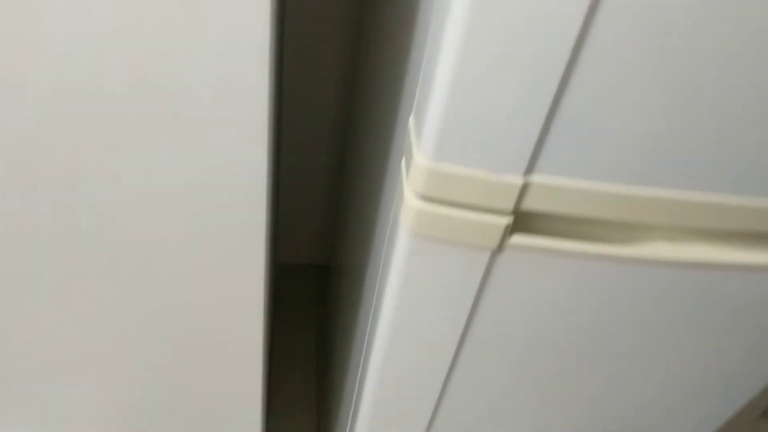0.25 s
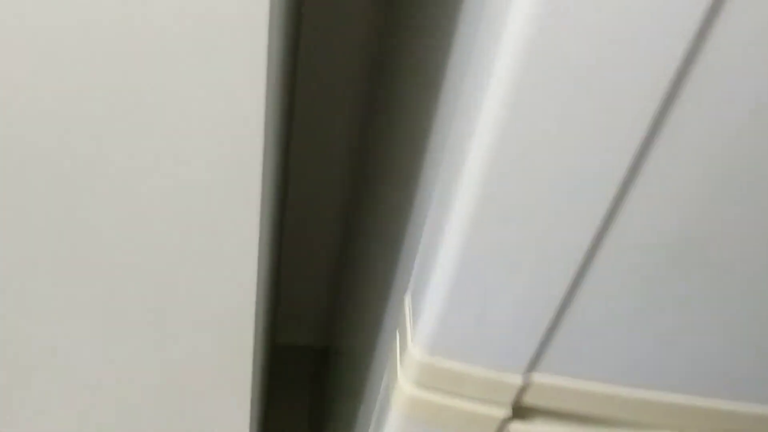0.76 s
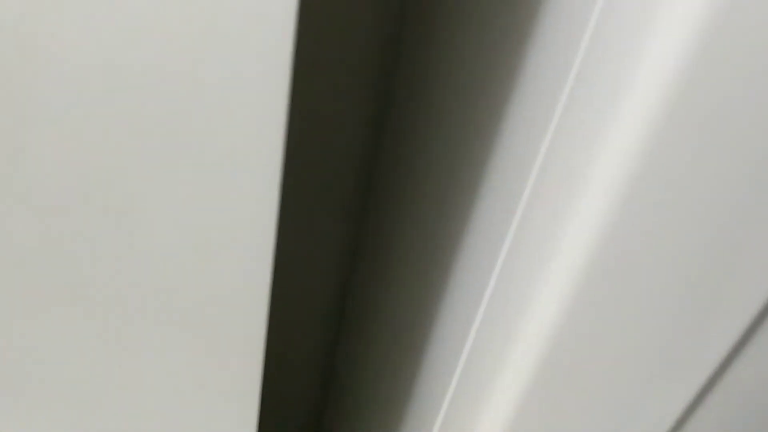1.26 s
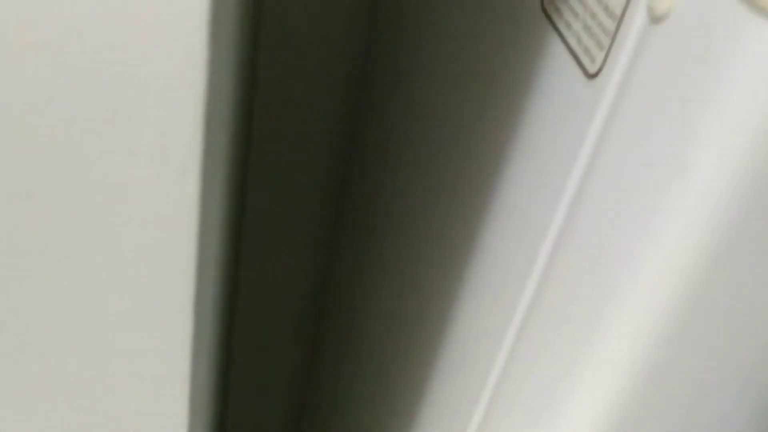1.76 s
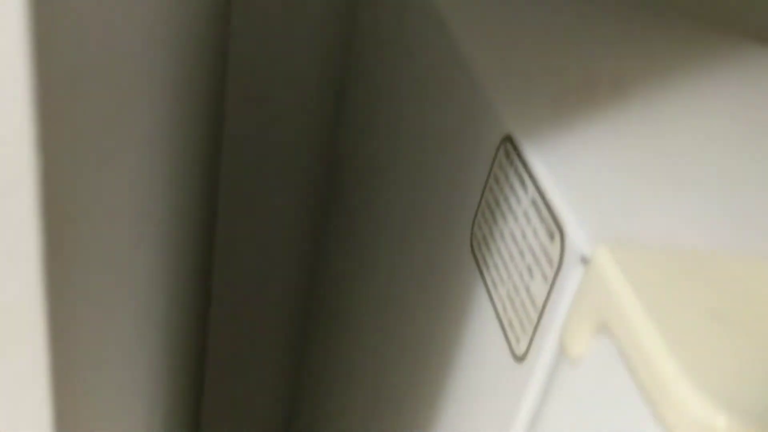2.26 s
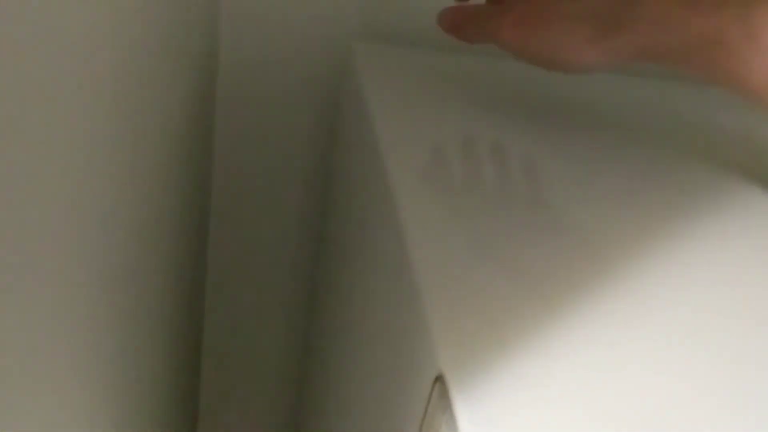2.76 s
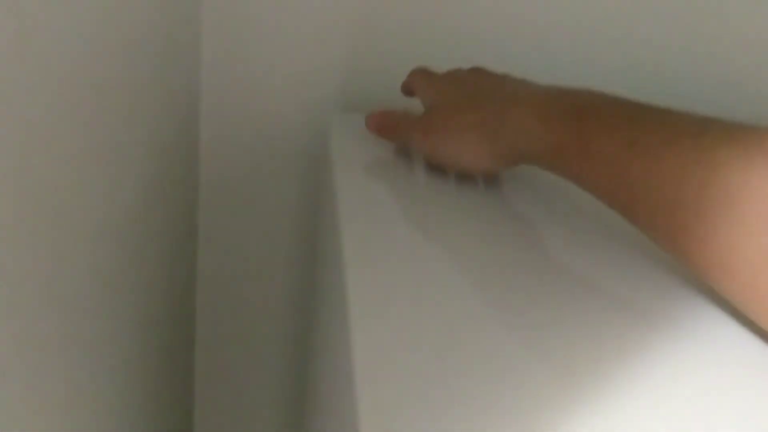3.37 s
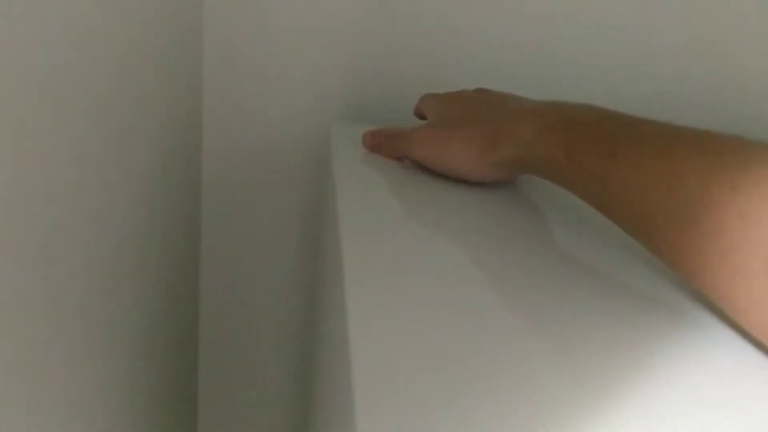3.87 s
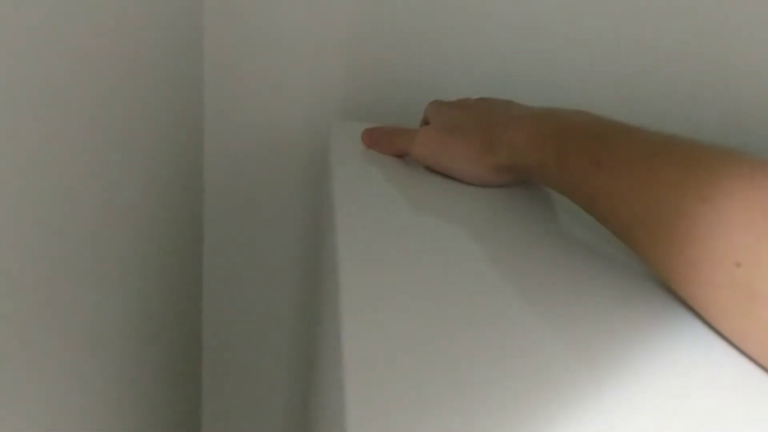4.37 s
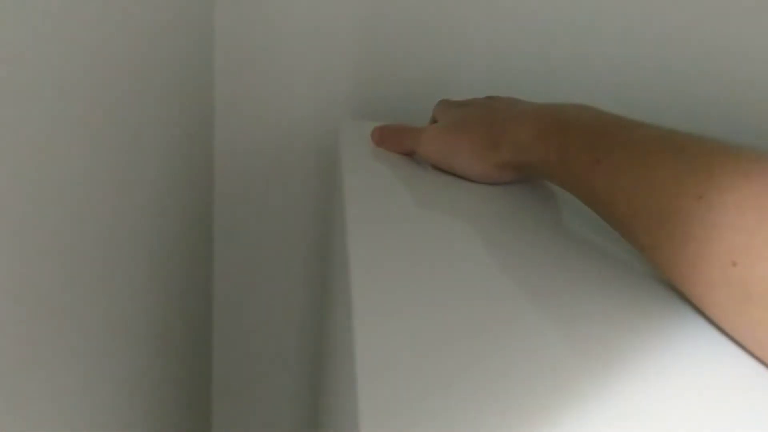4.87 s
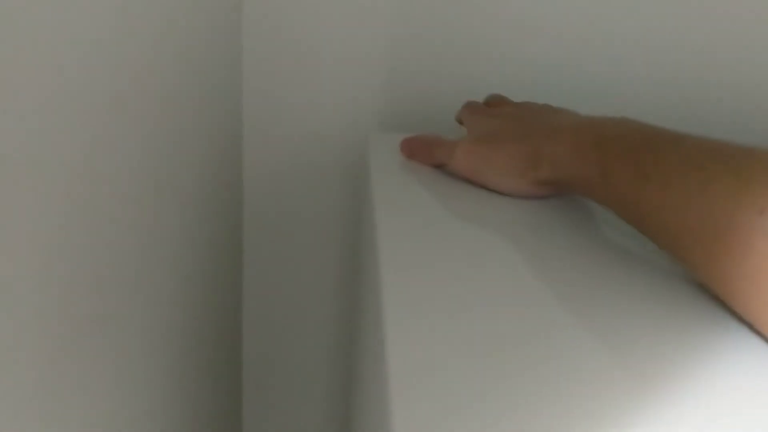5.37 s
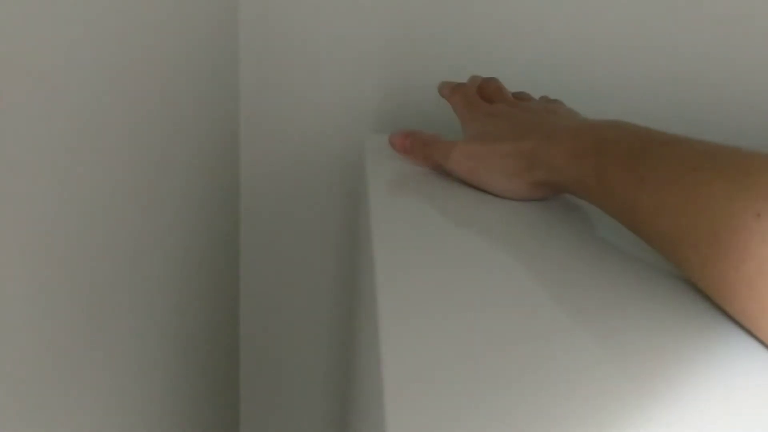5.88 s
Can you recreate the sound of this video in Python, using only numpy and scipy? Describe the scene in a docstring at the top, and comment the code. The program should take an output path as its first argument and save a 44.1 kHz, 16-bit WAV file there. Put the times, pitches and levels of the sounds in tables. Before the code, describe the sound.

A refrigerator compressor hums with a fine, high buzz in a small, quiet room. A light, sharp click sounds early on. As the microphone rises from the doors to the top, the hum grows louder and its tones waver. Then, when a hand presses on the top, a loose metal part starts to rattle, throbbing in two swells with small hollow knocks over soft room noise.

```python
"""In a small quiet room a refrigerator hums while the microphone rises from its doors to its top.
The piston compressor shakes the cabinet once a turn, giving a harmonic hum and a fine buzz whose
partials swell and fade through standing waves. When a hand presses on the top, a loose metal part
starts to bounce, and its impacts ring the metal in two throbbing swells of rattle.
A few light clicks and faint brushes of fingers sound nearby, over the soft noise of the room."""
import sys
import numpy as np
from scipy import signal
from scipy.fft import rfft, irfft, next_fast_len
from scipy.io import wavfile
from scipy.ndimage import uniform_filter1d

SR = 44100
rng = np.random.default_rng(int(sys.argv[2]) if len(sys.argv) > 2 else 0)


def generate_wav(signal):
    """Clip the signal to [-1, 1] and save it as 16-bit WAV at the path in sys.argv[1]."""
    frames = np.transpose(np.atleast_2d(signal))
    scaled = np.clip(frames, -1, 1) * 32767
    pcm = np.round(scaled).astype(np.int16)
    wavfile.write(sys.argv[1], SR, pcm)


N = 269451
TIME = np.arange(N) / SR
SLOW_TIME = TIME[::100]   # coarse grid for slowly changing gains and phases
TURN_HZ = 48.86   # compressor shaft; its harmonics are called orders
SWAY_HZ, SWAY_DB, SWAY_RADIANS = 8.4, 2.8, .33   # rocking rate; its swing of level and phase


def from_db(db):
    """Amplitude grows tenfold with every 20 dB."""
    return 10 ** (np.asarray(db) / 20)


def rms_one(x):
    """Normalisation to unit mean power."""
    return x / np.sqrt(np.mean(x ** 2) + 1e-20)


def evened(x, size):
    """Division by the running rms over size samples flattens the envelope."""
    return x / np.sqrt(np.abs(uniform_filter1d(x ** 2, size=size)) + 1e-12)


def drift(rate, at=TIME):
    """Band-limited random variation: lines joining Gaussian values, rate of them per unit of at."""
    knots = rng.standard_normal(4096)
    return np.interp(at * rate, np.arange(len(knots)), knots)


def filtered(x, order, cutoff_hz, side):
    """Butterworth filtering passes the "low" or the "high" side of the cutoff."""
    return signal.sosfilt(signal.butter(order, cutoff_hz, side, fs=SR, output="sos"), x)


def coloured(x, spectrum):
    """Spectral shaping by a smooth curve through rows of frequency_hz, gain_db."""
    hz, db = np.transpose(spectrum)
    size = next_fast_len(len(x))
    bins = np.maximum(np.fft.rfftfreq(size, 1 / SR), 1)
    gain = from_db(np.interp(np.log(bins), np.log(hz), db))
    return irfft(rfft(x, size) * gain, size)[:len(x)]


def resonate(x, modes):
    """Modal superposition: damped resonators in parallel, with alternating signs."""
    out = 0
    for k, (hz, width_hz, db) in enumerate(modes):
        radius = np.exp(-np.pi * width_hz / SR)
        poles = [1, -2 * radius * np.cos(2 * np.pi * hz / SR), radius ** 2]
        ring = signal.lfilter([1, 0, -1], poles, x + 1e-18)
        out = out + (-1) ** k * from_db(db) * (1 - radius ** 2) / 2 * ring
    return out


def reverberate(x, t60_s, wet_db):
    """Diffuse reflections add a tail of exponentially decaying noise."""
    age = TIME[:SR // 2]
    tail = rng.standard_normal(len(age)) * np.exp(-np.log(1000) * age / t60_s)
    return x + from_db(wet_db) * signal.fftconvolve(x, tail / np.linalg.norm(tail))[:N]


# The microphone's rise: time_s, way_share
RISE = [(0, 0), (3.0, .88), (3.7, .98), (6.11, 1)]
def path(at=TIME):
    """Position in the sound field, as a share of the way from the doors (0) to the top (1)."""
    return np.interp(at, *np.transpose(RISE))


def along_path(doors_db, top_db):
    """A level gradient: the gain changes evenly in dB from the doors to the top."""
    return from_db(doors_db + (top_db - doors_db) * path())


def above(at=TIME, edge_share=0.68, width_share=0.12):
    """Acoustic shadow: 0 while the cabinet hides the gap behind it, nearing 1 past its upper edge."""
    return 1 / (1 + np.exp((edge_share - path(at)) / width_share))


# Spectrum of the room air: frequency_hz, gain_db
AIR_SPECTRUM = [(20, -30), (45, -2), (75, -3), (190, -1), (280, -1.5), (420, -6.5), (700, -9), (1050, -2),
                (1500, -6.5), (2500, -12.5), (4500, -19.5), (8000, -26), (15500, -41)]
def room_air(doors_db=-58, top_db=-52.5):
    """Ambient broadband noise, strongest in the bass and louder towards the top."""
    return along_path(doors_db, top_db) * rms_one(coloured(rng.standard_normal(N), AIR_SPECTRUM))


# Touches of the fingers: peak_s, level_db, half_length_s
FINGER_BRUSHES = [(.409, -69, 0.011), (.455, -72, .012), (.779, -68, .014), (1.523, -64, .015),
                  (4.099, -68, .012)]
# Spectrum of sliding skin: frequency_hz, gain_db
BRUSH_SPECTRUM = [(2000, -30), (5000, -5), (8500, -3), (11000, 1), (14000, 0), (16000, -7)]
def brushes():
    """Friction noise: skin slides briefly over the casing with a thin, soft hiss."""
    pressure = sum(from_db(db) * np.exp(-((TIME - s) / half_s) ** 2 / 2)
                   for s, db, half_s in FINGER_BRUSHES)
    return pressure * rms_one(coloured(rng.standard_normal(N), BRUSH_SPECTRUM))


# Light contacts: start_s, level_db, decay_s
CLICK_EVENTS = [(.407, -56.5, .006), (0.9737, -38, 0.0043), (0.9764, -38.5, 0.0035), (2.352, -57, .003)]
# Spectrum of the snap: frequency_hz, gain_db
CLICK_SPECTRUM = [(800, -10), (2300, -2), (3200, -6), (4700, -2), (6500, -9), (9000, -19), (12500, -19),
                  (16000, -24)]
# Resonances the clicks excite: pitch_hz, width_hz, gain_db
CLICK_RESONANCES = [(3950, 70, -6), (4230, 60, -1), (4880, 77, 1), (5500, 70, -4), (7470, 150, -12),
                    (12500, 120, -12)]
def clicks(tail_db=-15.0, tail_t60_s=0.49, ring_db=-13.0, ring_t60_s=0.19):
    """Impulsive excitation: each gritty snap leaves a thin ring and the diffuse tail of the room."""
    def dying(t60_s):
        """Exponential decay after each click, by 60 dB in t60_s."""
        return sum(from_db(db) * (TIME >= s) * np.exp(-np.log(1000) * np.abs(TIME - s) / t60_s)
                   for s, db, _ in CLICK_EVENTS)
    force = sum(from_db(db) * (TIME >= s) * np.exp(-np.abs(TIME - s) / decay_s)
                for s, db, decay_s in CLICK_EVENTS)
    grit = evened(coloured(rng.standard_normal(N), CLICK_SPECTRUM), size=60)
    ring = evened(resonate(rng.standard_normal(N), CLICK_RESONANCES), size=500)
    tail = from_db(tail_db) * dying(tail_t60_s)
    return np.hypot(force, tail) * grit + from_db(ring_db) * dying(ring_t60_s) * ring


# Mains hum and other motor tones: pitch_hz, level_at_top_db
STEADY_TONES = [(81, -66), (100, -59), (162, -65.5), (199.5, -65.5), (324, -68)]
def motor(doors_db=-13.0):
    """Steady forced vibration gives low pure tones, louder over the gap behind the cabinet."""
    tones = sum(from_db(db) * np.sin(2 * np.pi * (hz * TIME + rng.random())) for hz, db in STEADY_TONES)
    return np.sqrt(2) * tones * along_path(doors_db, 0)


def stroke(turns, depth=.38):
    """Amplitude modulation by the piston's push, once in every turn."""
    return 1 + depth * np.cos(2 * np.pi * turns)


def sway(at=TIME, doors_depth=.5):
    """Mass on springs: the compressor rocks, heard more from above; each call has its own phase."""
    depth = doors_depth + (1 - doors_depth) * above(at)
    return depth * np.sin(2 * np.pi * (SWAY_HZ * at + rng.random()))


def looseness(loose_at_s=4.385, loosen_s=0.024, seated_play=0.048):
    """Loss of contact: under the hand the part goes from slight play to free bouncing (1)."""
    return np.interp(TIME, [loose_at_s, loose_at_s + loosen_s], [seated_play, 1])


def ripple(place, antinode, spacing, reflection):
    """Interference: a tone and its reflection reinforce and weaken each other along the way."""
    return np.abs(1 + reflection * np.exp(2j * np.pi * (place - antinode) / spacing))


def standing_wave(place, doors_db, top_db, *pattern):
    """A standing wave from the wall lays nodes and antinodes over a tone's level gradient."""
    return from_db(doors_db + (top_db - doors_db) * place) * ripple(place, *pattern)


# High orders that meet a resonance of the pipes:
# order, doors_db, top_db, antinode_share, spacing_share, reflection_ratio
PIPE_ORDERS = [(54.0, -73.5, -69.0, 0.11, 0.35, 0.6), (63.0, -76.0, -67.5, 0.01, 0.31, 0.6),
               (75.0, -80.5, -72.5, 0.02, 0.26, 0.45), (76.0, -79.5, -74.5, 0.16, 0.25, 0.45),
               (78.0, -83.0, -73.5, 0.3, 0.75, 0.9), (80.0, -86.0, -76.0, 0.25, 0.71, 0.6),
               (89.0, -92.0, -69.5, 0.06, 1.51, 0.9), (96.0, -86.5, -78.5, 0.38, 0.8, 0.75),
               (101.0, -92.5, -80.0, 0.1, 0.22, 0.45), (112.0, -83.5, -83.5, 0.38, 0.53, 0.6),
               (114.0, -95.5, -79.5, 0.11, 0.22, 0.45)]
def pipes(turns, gain_db=-3.0, loose_loss_db=-4.0):
    """Resonance: thin metallic tones pulse with the stroke and swell and fade in standing waves."""
    place = path(SLOW_TIME)
    tones = 0
    for order, *wave in PIPE_ORDERS:
        gain = standing_wave(place, *wave) * from_db(SWAY_DB * sway(SLOW_TIME))
        phase = 2 * np.pi * (order * turns + rng.random())
        tones = tones + np.interp(TIME, SLOW_TIME, gain) * np.sin(phase)
    return np.sqrt(2) * tones * stroke(turns) * from_db(gain_db + loose_loss_db * looseness())


# Reflections of the buzz from the walls: doors_lag_s, top_lag_s, gain_ratio
WALL_REFLECTIONS = [(.00155, 0.000867, 0.2), (.0031, .00225, 0.33)]
def wall_echoes(x):
    """Comb filtering: echoes arrive sooner as the microphone rises, so the notches sweep upward."""
    return x + sum(gain * np.interp(TIME - doors_s - (top_s - doors_s) * path(), TIME, x)
                   for doors_s, top_s, gain in WALL_REFLECTIONS)


# Broad spectrum of the buzz: frequency_hz, gain_db
BUZZ_SPECTRUM = [(2300, -32), (3000, 0), (3400, -14.5), (4000, -16.5), (5400, -13), (6500, -16.5),
                 (8200, -28), (9300, -20), (12000, -17), (13800, -21), (15500, -17.5)]
# Resonances of shell and pipes: pitch_hz, width_hz, gain_db
SHELL_MODES = [(2596, 170, 0), (2960, 37, 3), (3067, 84, -4.5), (3300, 160, -14), (3680, 78, -3.5),
               (3870, 57, 1), (4230, 105, -8.5), (4740, 30, -6), (5460, 62, -22), (6790, 54, -8),
               (6960, 33, -16.5), (7920, 200, -11), (8580, 110, -17)]
def buzz(turns, doors_db=-64.5, top_db=-56, hiss_db=-24.0, fades_per_way=7.06, flutter=0.32,
         loose_loss_db=-3.0):
    """Periodic forcing rings the shell with high overtones; their mix varies with sway and position."""
    period = round(SR / TURN_HZ)
    angle = (turns + .0004 * drift(200)) % 1   # timing jitter blurs the highest overtones into hiss
    overtones = 0
    for _ in range(4):
        cycle = irfft(np.exp(2j * np.pi * rng.random(period // 2)), 4 * period)
        weight = drift(fades_per_way, path()) + flutter * sway()
        overtones = overtones + weight * np.interp(angle, np.arange(len(cycle)) / len(cycle), cycle)
    force = stroke(turns) * (evened(overtones, size=period) + from_db(hiss_db) * rng.standard_normal(N))
    shell = resonate(force, SHELL_MODES) + coloured(force, BUZZ_SPECTRUM)
    bright = filtered(shell, order=6, cutoff_hz=2400, side="high")
    gain = along_path(doors_db, top_db) * from_db(loose_loss_db * looseness())
    return gain * evened(wall_echoes(bright), size=9000)


# Base level of the shadowed orders: time_s, level_db
HUM_LEVEL = [(0, -55), (1.5, -50.5), (3.0, -50.5), (4.2, -50), (4.6, -54), (6.11, -51)]
# Orders whose balance shifts at the cabinet's edge, relative to that level: order, doors_db, above_db
SHADOWED_ORDERS = [(1, -12, -9), (2, -20, -23), (3, -22.5, -26), (4, -29.5, -19), (5, -17, -12.5),
                   (6, -14.5, -5.5), (7, -20, -51), (8, -22.5, -42), (35, -26, -21), (36, -18, -16.5),
                   (37, -25, -18), (38, -13.5, -35), (42, -14.5, -41), (43, -33, -18), (44, -17.5, -14.5),
                   (46, -27, -13), (47, -16.5, -28), (50, -12.5, -22)]
# Orders in standing waves: order, doors_db, top_db, antinode_share, spacing_share, reflection_ratio
STANDING_ORDERS = [(10.0, -69.5, -59.5, 0.42, 1.02, 0.45), (11.0, -58.0, -50.0, 0.3, 0.51, 0.25),
                   (12.0, -60, -51, 0.54, 0.85, 0.26), (13.0, -59.0, -58, 0.98, 1.17, 0.45),
                   (14.0, -59.5, -68, 0.43, 0.58, 0.39), (15.0, -62.5, -51.5, 0.54, 0.95, 0.54),
                   (16.0, -69.5, -51, 0.16, 0.528, 0.32), (17.0, -78, -51, 0.06, 0.38, 0.2),
                   (18.0, -63.5, -56.0, 0.14, 0.67, 0.65), (19.0, -58.5, -39, 0.26, 1.28, 0.71),
                   (20.0, -55.5, -50, 0.46, 0.78, 0.96), (21.0, -74.5, -46.5, 0.3, 1.35, 0.94),
                   (22.0, -48, -62.5, 0.24, 0.41, 0.42), (23.0, -55, -72, 0.68, 1.4, 0.81),
                   (24.0, -61, -60, 0.74, 0.75, 0.17), (25.0, -51.5, -49, 0.59, 0.89, 0.77),
                   (26.0, -55.5, -49, 0.45, 0.7, 0.32), (27.0, -57, -45.5, 0.18, 0.317, 0.31),
                   (28.0, -54.5, -60.5, 0.5, 0.71, 0.51), (29.0, -71, -47.5, 0.15, 0.55, 0.44),
                   (30.0, -74, -52.5, 0.53, 0.35, 0.3), (31.0, -59.5, -46, 0.13, 0.373, 0.42),
                   (32.0, -76, -61, 0.18, 0.64, 0.2), (33.0, -69.5, -53, 0.26, 0.63, 0.41),
                   (34.0, -77, -54.5, 0.06, 0.57, 0.48), (39.0, -51.5, -58.5, 0.4, 0.75, 0.48),
                   (40.0, -65.5, -63, 0.34, 0.38, 0.65), (41.0, -66.5, -61.5, 0.43, 0.84, 0.63),
                   (45.0, -73, -63, 0.02, 0.32, 0.16), (48.0, -76.0, -54, 0.053, 0.376, 0.38),
                   (49.0, -72, -58.5, 0.23, 0.51, 0.33)]
# Weaker reflections from the cabinet: order, antinode_share, spacing_share, reflection_ratio
CABINET_REFLECTIONS = [(19, .13, .14, .18), (20, .48, .6, .3), (22, .14, .34, .17), (25, .18, .6, .3),
                       (26, .29, .53, .3), (27, .51, .6, .3), (31, .01, .26, .15), (33, .08, .41, .3),
                       (39, .335, .17, .25)]
def hum(turns, fade_db=2.0, waver_db=0.75, standing_db=-0.39, upper_hz=580,
        press_s=4.16, press_hz=910, press_width_hz=88, press_db=-4.5, loose_loss_db=-4.5,
        falter_radians=0.5, wander_radians=.55, wanders_per_way=4, chirp_orders=11.3, scatter_cycles=.11):
    """Harmonic series of the shaft; the upper orders flutter, and falter once the part is loose."""
    place, height, loose = path(SLOW_TIME), above(SLOW_TIME), looseness()[::100]
    level_db = np.interp(SLOW_TIME, *np.transpose(HUM_LEVEL))
    orders = []
    for order, doors_db, above_db in SHADOWED_ORDERS:
        balance = from_db(doors_db) * (1 - height) + from_db(above_db) * height
        orders.append((order, balance * from_db(level_db + fade_db * drift(1.296, SLOW_TIME))))
    for order, *wave in STANDING_ORDERS:
        orders.append((round(order), from_db(standing_db) * standing_wave(place, *wave)))
    cabinet = {order: ripple(place, *wave) for order, *wave in CABINET_REFLECTIONS}
    pressure = np.clip((SLOW_TIME - press_s) * 20 + .5, 0, 1)
    tones = 0
    for order, gain in orders:
        hz = order * TURN_HZ
        upper = 1 / (1 + (upper_hz / hz) ** 8)
        falter = loose * upper
        # the pressing hand damps one resonance of the top
        damping_db = press_db * pressure * np.exp(-((hz - press_hz) / press_width_hz) ** 2 / 2)
        flutter_db = upper * SWAY_DB * sway(SLOW_TIME) + waver_db * drift(10, SLOW_TIME)
        gain = gain * cabinet.get(order, 1) * from_db(damping_db + flutter_db + loose_loss_db * falter)
        # dispersion in the panels spreads each stroke into a chirp
        lag_cycles = order ** 2 / (2 * chirp_orders) + scatter_cycles * rng.standard_normal()
        shift = upper * SWAY_RADIANS * sway(SLOW_TIME) - 2 * np.pi * lag_cycles
        shift += falter_radians * falter * drift(25, SLOW_TIME)
        shift += wander_radians * drift(wanders_per_way, place)
        phase = 2 * np.pi * order * turns + np.interp(TIME, SLOW_TIME, shift)
        tones = tones + np.interp(TIME, SLOW_TIME, gain) * np.sin(phase)
    return np.sqrt(2) * tones * stroke(turns, depth=.2 * (1 - above()))


def contacts(turns, count, scatter_turns, uneven_db):
    """An impulse train of unit power: count contacts a turn, uneven in timing and strength."""
    timing, strength = rng.standard_normal((2, 320, count))
    places = (np.arange(count) + rng.random(count) / 2) / count
    contact_turns = np.arange(len(timing))[:, None] + places + scatter_turns * timing
    samples = np.searchsorted(turns, contact_turns.ravel())
    return rms_one(np.bincount(samples, from_db(uneven_db * strength).ravel(), N + 1)[:N])


# Spells in which the part is shaken: start_s, end_s, level_db
SHAKING_SPELLS = [(3.113, 3.666, -56), (4.008, 4.108, -49), (4.345, 6.11, -48), (4.5, 5.045, -38.5),
                  (5.664, 6.11, -44.5)]
def shaking(attack_s=0.072, release_s=0.14, idle_db=-64):
    """Driving amplitude of the part: spells build, hold and die away, adding in power."""
    power = from_db(idle_db) ** 2
    for start_s, end_s, db in SHAKING_SPELLS:
        attack = np.clip((TIME - start_s) / attack_s, 0, 1)
        release = np.exp(-np.maximum(TIME - end_s, 0) / release_s)
        power = power + (from_db(db) * attack * release) ** 2
    return np.sqrt(power)


# Resonances of the seated part: pitch_hz, width_hz, gain_db
SEATED_MODES = [(1360, 36, -13), (1600, 20, -3), (2210, 130, 3), (2284, 48, -1)]
def chatter(turns, level_db=-57.0, start_s=1.2, peak_s=3.14, end_s=4.17, ease_s=0.05, sharpness=1.6):
    """Intermittent contact: the seated part brushes the metal once a sway, in a light throb."""
    ring = resonate(contacts(turns, count=11, scatter_turns=.03, uneven_db=8.0), SEATED_MODES)
    lean = ((1 + np.cos(2 * np.pi * SWAY_HZ * (TIME - peak_s))) / 2) ** sharpness
    growth = np.clip((TIME - start_s) / (peak_s - start_s), 0, 1)
    ending = np.clip((end_s - TIME) / ease_s, 0, 1)
    return from_db(level_db) * lean * growth * ending * evened(ring, size=900)


# Low resonances of the rocking part: pitch_hz, width_hz, gain_db
LOW_MODES = [(881.5, 3.5, 5), (967.4, 7, 4), (1122, 48, -16), (1417, 11, -14), (1580, 110, -19.5)]
def rocking(turns, gain_db=-25.0, seated_db=-8.5, growth_exponent=0.36):
    """Repeated soft contacts sustain the low modes, which grow more slowly than the shaking."""
    ring = resonate(contacts(turns, count=9, scatter_turns=0.019, uneven_db=1.0), LOW_MODES)
    gain = from_db(gain_db + seated_db * (1 - looseness())) * shaking() ** growth_exponent
    return gain * evened(ring, size=1100) * stroke(turns, depth=0.048)


# Bouts of hard bouncing: peak_s, level_db, extra_treble_db
BOUNCING_BOUTS = [(4.408, -42.5, -2), (4.463, -40, -5), (4.495, -40.5, -3), (4.545, -40.5, 2.5),
                  (4.592, -51, -3), (4.628, -39, -8), (4.662, -34.5, -1), (4.706, -34, 2.5),
                  (4.747, -33.5, 0.5), (4.79, -36, 2), (4.828, -33.5, 1.5), (4.87, -36, 1.5),
                  (4.892, -37.5, 0.5), (4.915, -37, 0), (4.951, -34, 6.5), (4.986, -39, 1),
                  (5.012, -34.5, 4.5), (5.076, -33.5, 1.5), (5.138, -35, -6), (5.187, -47, -6),
                  (5.308, -46, -7), (5.467, -38, -6), (5.529, -42.5, -3), (5.608, -38, -6.5),
                  (5.671, -42, -13), (5.751, -32.5, -1), (5.811, -31, 2), (5.872, -32, -0.5),
                  (5.934, -30.5, 0), (5.993, -33, -5), (6.049, -38.5, -5)]
def bout_force(treble=False, rise_s=0.004, fall_s=0.013):
    """Impact envelope: each bout builds fast and dies more slowly; its hardness sets the treble."""
    force = np.zeros(N)
    for peak_s, db, extra_treble_db in BOUNCING_BOUTS:
        near = slice(*np.searchsorted(TIME, [peak_s - .06, peak_s + .08]))
        age = TIME[near] - peak_s
        width_s = np.where(age < 0, rise_s, fall_s)
        force[near] += from_db(db + treble * extra_treble_db) * np.exp(-(age / width_s) ** 2 / 2)
    return force


# Resonances of the cabinet panel: pitch_hz, width_hz, gain_db
PLATE_MODES = [(490.4, 8.9, 2), (705, 39, -5.5), (786, 9, 5), (827, 21, 0), (885, 14, 3.5),
               (1100, 130, -13), (1290, 155, -9)]
def drumming(turns, gain_db=-1.0, seated_db=-42.0, throb_exponent=0.15):
    """Plate vibration: the panel takes the loose part's heavier knocks and throbs with the bouts."""
    ring = resonate(contacts(turns, count=7, scatter_turns=0.0889, uneven_db=1.5), PLATE_MODES)
    throb = evened(bout_force() + from_db(-69), size=8000) ** throb_exponent
    gain = from_db(gain_db + seated_db * (1 - looseness())) * shaking()
    return gain * throb * evened(ring, size=900)


# Heavy landings on the panel: peak_s, level_db, pitch_hz
LANDINGS = [(4.604, -43, 890), (4.628, -38, 890), (4.786, -37, 890), (4.868, -48, 920), (4.943, -36, 920),
            (5.0, -36, 970), (5.311, -37.5, 975), (5.562, -47, 960), (5.681, -36.5, 900)]
def thumps(width_hz=90, half_length_s=0.0067):
    """A strongly damped panel resonance answers each heavy landing with a short, hollow knock."""
    knocks = 0
    for peak_s, db, hz in LANDINGS:
        envelope = from_db(db) * np.exp(-((TIME - peak_s) / half_length_s) ** 2 / 2)
        ring = resonate(rng.standard_normal(N), [(hz, width_hz, 0)])
        knocks = knocks + envelope * evened(ring, size=600)
    return knocks


# Narrow resonances of the struck metal: pitch_hz, width_hz, gain_db
STRUCK_MODES = [(1417, 32, -5), (1504, 32, 6), (1580, 26, -1), (1896, 22, 1.5), (2364, 11.5, -5),
                (2680, 54, -8), (3067, 75, -12.5), (3240, 23, -8.5), (3710, 60, -8.5), (4270, 116, -12),
                (5230, 19, -19), (5420, 32, -13.5), (5660, 33, -18), (5870, 30, -28), (6500, 26, -22),
                (7540, 40, -26)]
# Dense ring of the sheet: frequency_hz, gain_db
SHEET_SPECTRUM = [(300, -43), (420, -36), (500, 0.5), (620, -6.5), (800, 0.5), (1100, -0.5), (1350, 0),
                  (1470, 2), (1560, 2.5), (1750, -9), (2250, 4.5), (3400, -34), (4800, -13), (6100, -13.5),
                  (8500, -35), (16000, -61)]
def rattle(turns, modes_db=0.5, sheet_db=-5.0, clatter_db=-1.5, soft_loss=0.51, hard_lift=0.026,
           split_hz=3700):
    """Contact time sets brightness: light bounces last longer and sound dull, hard ones ring bright."""
    hits = contacts(turns, count=26, scatter_turns=.03, uneven_db=2.5)
    modes = from_db(modes_db) * rms_one(resonate(hits, STRUCK_MODES))
    sheet = from_db(sheet_db) * rms_one(coloured(hits, SHEET_SPECTRUM))
    ring = evened(modes + sheet, size=650)
    treble = filtered(ring, order=1, cutoff_hz=2600, side="high")
    soft = ring - soft_loss * treble
    hard = ring + hard_lift * treble
    clatter = soft * from_db(clatter_db) * shaking() * stroke(turns, depth=0.26)
    body = filtered(hard, 3, split_hz, "low") * bout_force()
    edge = filtered(hard, 3, split_hz, "high") * bout_force(treble=True)
    return reverberate(clatter + body + edge, t60_s=.22, wet_db=-8.0)


def scene():
    """Superposition of all sources; hum, buzz and rattle follow the one compressor shaft."""
    turns = np.cumsum(TURN_HZ + 0.011 * drift(6)) / SR
    air = room_air()
    compressor = hum(turns) + motor() + buzz(turns) + pipes(turns)
    loose_part = rocking(turns) + chatter(turns) + drumming(turns) + thumps() + rattle(turns)
    loose_part *= along_path(doors_db=-14, top_db=0)
    return (compressor + loose_part + clicks() + brushes() + air)[None]


def record(dry, cutoff_hz=15700):
    """Band limiting: a steep elliptic low-pass removes the highest treble."""
    return signal.sosfilt(signal.ellip(12, .1, 80, cutoff_hz, fs=SR, output="sos"), dry)


dry = scene()
out = record(dry)
generate_wav(out)
```